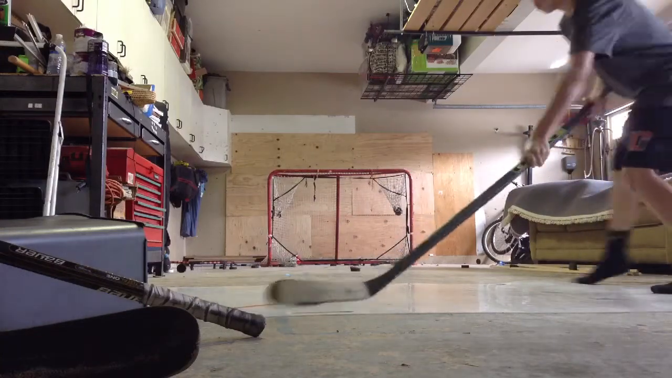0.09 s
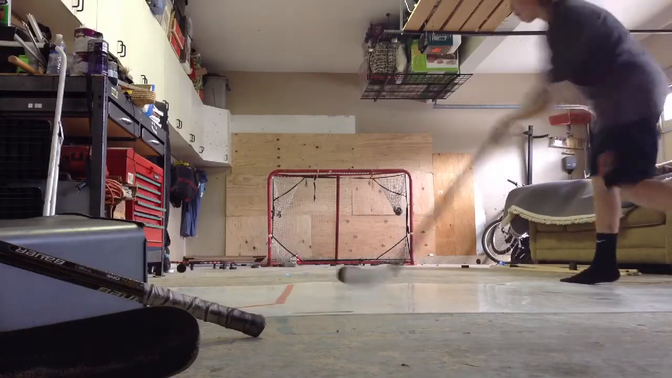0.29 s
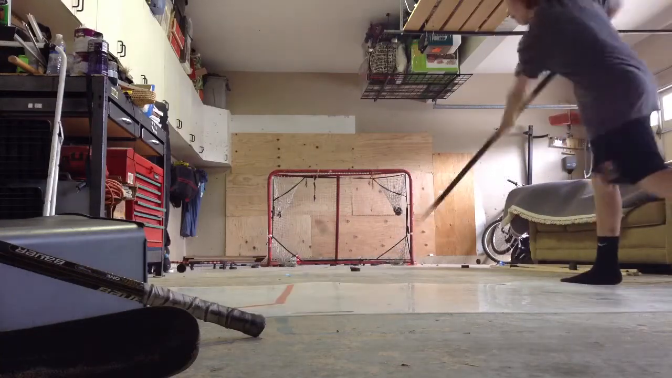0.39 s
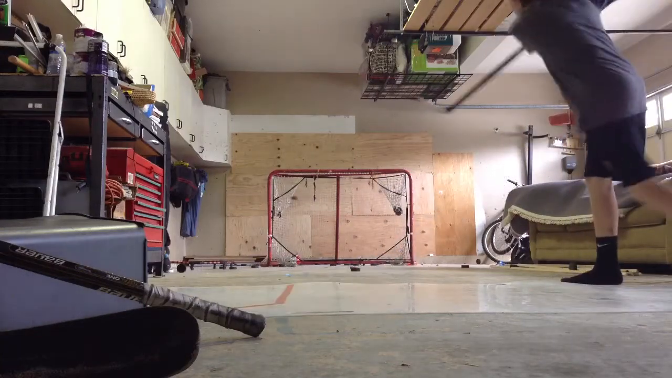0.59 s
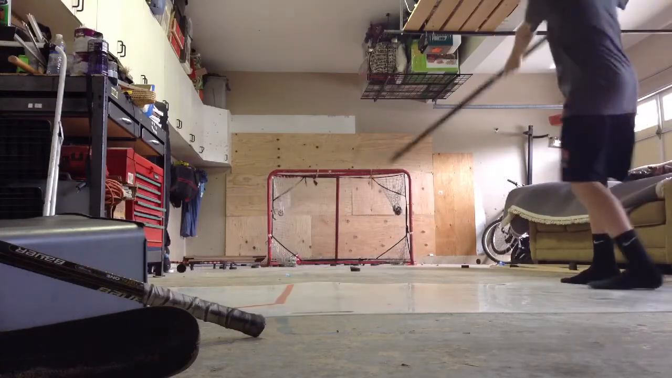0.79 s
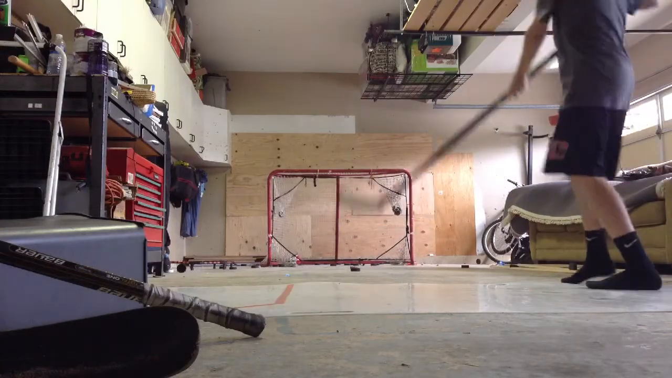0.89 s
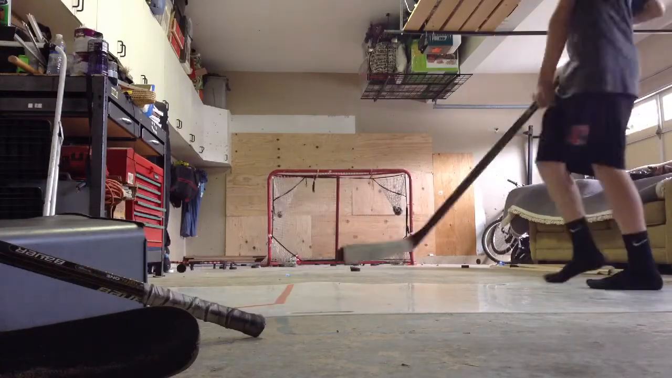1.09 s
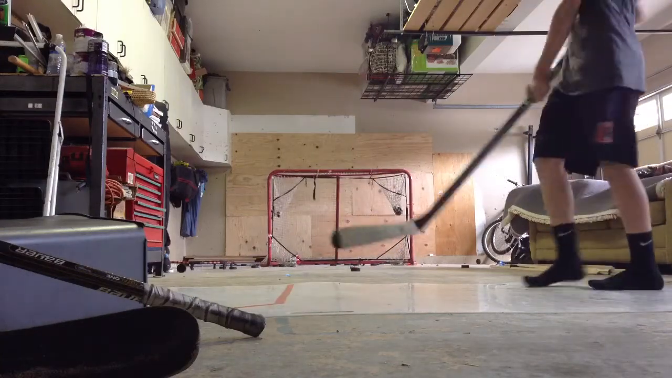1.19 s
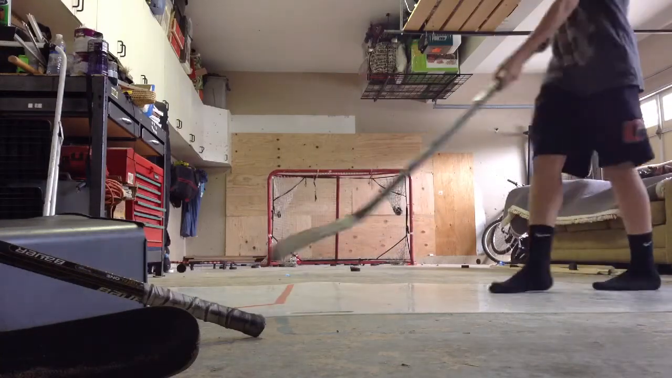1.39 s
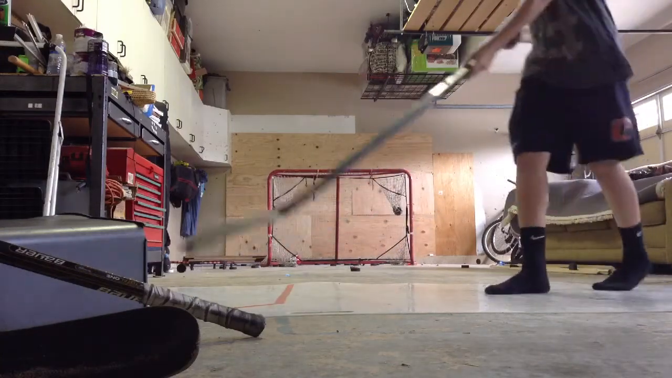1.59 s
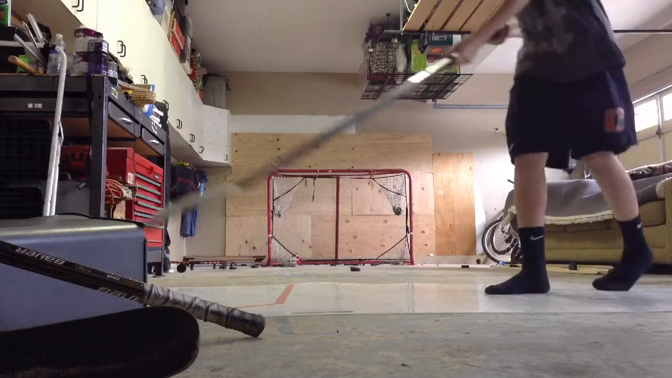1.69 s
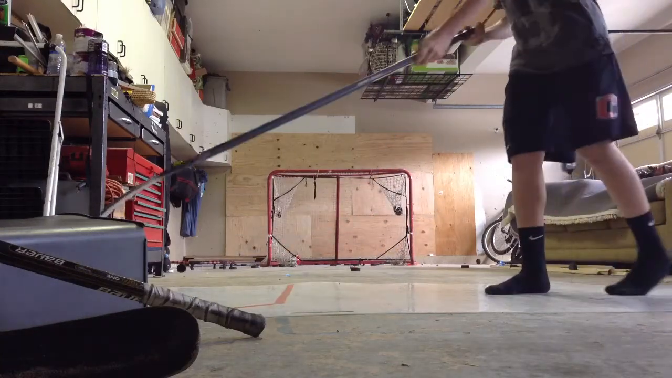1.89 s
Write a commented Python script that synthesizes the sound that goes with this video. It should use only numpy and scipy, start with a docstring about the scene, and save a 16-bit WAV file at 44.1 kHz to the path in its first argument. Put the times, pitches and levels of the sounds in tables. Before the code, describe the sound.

Short gritty drag, then a loud, bright stick clack with a roomy echo; puck knocks follow in clusters with a thin skid and soft sock shuffles, fading to faint hiss in a hard garage.

```python
"""A stick blade drags a puck over a plastic pad and snaps it away: coloured clicks over sliding grit.
The puck thuds into net and boards, bounces and skids on the floor of a bare garage; each blow is heard
direct, in near echoes and through the room's decaying tail. Sharp ticks and thin squeaks of plastic
stand out. Socks shuffle near the microphone as soft noise, over room hiss and a faint mains hum."""
import sys
import numpy as np
from scipy import signal
from scipy.fft import rfft, irfft
from scipy.io import wavfile

SR = 44100
rng = np.random.default_rng(int(sys.argv[2]) if len(sys.argv) > 2 else 0)


def unload_wav(signal):
    """Save mono or channel-first audio to the path in sys.argv[1] as 16-bit WAV at rate SR, clipped to [-1, 1]."""
    wavfile.write(
        sys.argv[1],
        SR,
        np.round(np.clip(np.atleast_2d(signal).T, -1, 1) * 32767).astype(np.int16),
    )


def gain_from_db(level_db):
    """Convert decibel levels to linear amplitude factors (20 dB per decade)."""
    decades = np.asarray(level_db, float) / 20
    return 10 ** decades


N = 83790

# Blows of the stick blade on puck and pad, levels by path to the microphone:
# start_s, direct_db, early_echo_db, room_db, tilt_db_per_octave, knock_hz
STICK_BLOWS = [(.104, -43, -35.5, -44, -9.5, 330), (.196, -17.5, -21, -21, -11.5, 500),
               (.206, -12.5, -16.5, -23, -2.5, 724), (.219, -32, -21, -20, -4, 500),
               (.245, -5, -0.5, 1.5, 0, 636), (.263, -13, -3, 7.5, 5, 2260), (.282, -9, 1, 5, -0.5, 910),
               (.33, -26, -7, 1.5, 4.5, 3630)]
# Blows of the puck on net, boards and floor, same columns:
# start_s, direct_db, early_echo_db, room_db, tilt_db_per_octave, knock_hz
PUCK_BLOWS = [(.688, -24, -15, -12, -4.5, 330), (.705, -14, -13.5, -10, -3, 730),
              (.722, -41, -10, -13, 0, 1000), (.745, -39, -12, -12, 0.5, 910),
              (.795, -18, -20, -24, -3, 330), (.885, -20, -8.5, -9.5, -3, 450),
              (.895, -12, -12, -16, 2.5, 5400), (.908, -42, -3.5, -8.5, 0.5, 2300),
              (.965, -15, -16, -21, -0.5, 540), (1.139, -23, -2, -2, -0.5, 1060),
              (1.150, -5, 0.5, -3.5, 1, 5400), (1.200, -12, -10.5, -11, -0.5, 960),
              (1.643, -61, -40, -40.5, -5.5, 383), (1.69, -50, -46, -47.5, -3.5, 350),
              (1.73, -51.5, -48, -46.5, -3, 340)]
# Broad, quickly damped colour of the blade: pitch_hz, relative_level_db
BLADE_COLOUR = [(59, -81), (100, -40), (343, -9.5), (513, -13), (608, 2), (780, 3), (991, -5.5), (1230, 6),
                (1450, -9.5), (1620, -7.5), (2300, -9.5), (4000, -17.5), (7940, -26), (15500, -40.5)]
# Broad, quickly damped colour of net, boards and floor: pitch_hz, relative_level_db
BOARD_COLOUR = [(59, -80), (100, -36.5), (295, -7.5), (600, -5.5), (1030, -4.5), (1200, -7.5), (2080, -9),
                (2750, -12.5), (3470, -14.5), (4670, -19), (9000, -25.5), (15500, -37)]
# Longer-ringing modes of the blade: pitch_hz, width_hz, rise_above_colour_db
BLADE_RINGS = [(436, 13, 4.5), (762, 30, 3), (840, 18, 4.5), (999, 9.5, 6.5), (1477, 40, 9.5),
               (1835, 30, 4.5), (2314, 46, 6), (3280, 60, 4)]
# Longer-ringing modes of net, boards and floor: pitch_hz, width_hz, rise_above_colour_db
BOARD_RINGS = [(330, 21, 1.7), (425, 12, 1.6), (640, 53, 3.6), (960, 20, 3), (1050, 23, 4.6),
               (1510, 46, 4.4), (2130, 68, 3.4), (5400, 220, 2.4)]
# Decay of the bare garage: pitch_hz, time_to_fall_60_db_s
GARAGE_DECAY = [(120, 1), (250, 0.42), (530, .65), (1400, 0.63), (3700, 0.79), (7000, 0.77), (11000, 0.42),
                (15000, 0.19)]
# Blade and puck dragged over the pad: time_s, level_db
DRAG_LEVEL = [(0, -39), (.08, -34), (.118, -29.5), (.17, -31), (.21, -32.5), (.24, -27)]
# Colour of the drag: pitch_hz, relative_level_db
DRAG_SPECTRUM = [(150, -53), (280, -9), (600, -13.5), (900, -7.5), (1400, -5), (2250, 0.5), (3000, -3.5),
                 (5000, -4), (9500, -5), (11000, 0), (15500, 0.5)]
# Puck skidding on: time_s, level_db
SKID_LEVEL = [(.9, -32.5), (1.0, -54), (1.12, -51.5), (1.2, -37.5), (1.32, -49), (1.43, -51.5),
              (1.52, -63.5)]
# Colour of the skid: pitch_hz, relative_level_db
SKID_SPECTRUM = [(600, -51), (2000, -23), (6000, 1), (11000, 2), (15500, -1)]
# Sharp treble ticks: start_s, peak_level_db
TICK_TIMES = [(0.119, -15), (.2452, -5), (.2628, -3.5), (.2745, -11), (.535, -30), (1.136, -38)]
# Colour of the ticks: pitch_hz, relative_level_db
TICK_SPECTRUM = [(500, -44.5), (2500, -4), (6000, 12), (11000, -2.5), (15500, -9)]
# Thin squeaks of rubbing plastic: start_s, length_s, pitch_hz, resonator_pole_width_hz, level_db
SQUEAK_TIMES = [(.195, .024, 4500, 150, -41), (.217, .009, 5350, 300, -39), (.74, .14, 5450, 180, -54),
                (.755, .105, 10150, 250, -47)]
# Socks on the floor, one list for each shuffle: time_s, level_db
SHUFFLE_LEVELS = [
    [(.5, -60), (.6, -50), (.63, -47.5), (.66, -38), (.72, -37), (.8, -43.5), (.85, -52), (.89, -42)],
    [(1.62, -78), (1.664, -57.5), (1.732, -53.5), (1.8, -51), (1.9, -52.5)],
]
# Colour of the socks: pitch_hz, relative_level_db
SHUFFLE_SPECTRUM = [(350, -40), (700, -28.5), (1500, -13), (4700, -10), (8000, -9.5), (11200, -9),
                    (15500, -11.5)]
# Low shudder after the shot, one row: time_to_fall_20_db_s, pitch_hz, starting_level_db
SHUDDER = (.1, 38, -60)
# Mains hum: pitch_hz, level_db
MAINS_HUM = [(120, -79), (240, -72)]
# Colour of the room hiss: pitch_hz, relative_level_db
HISS_SPECTRUM = [(18, -51.5), (40, -45), (109, -18.5), (250, -2), (426, -4), (684, -7.5), (1040, -19),
                 (1540, -20.5), (6000, -22), (12000, -18), (15500, -15.5)]


def evened(x):
    """Scales x to rms 1."""
    return x / np.sqrt(np.mean(x ** 2) + 1e-20)


def read(points, hz):
    """Reads a table of pitches and values at hz, along a log pitch scale."""
    pitch, value = np.transpose(points)
    return np.interp(np.log(hz + 1), np.log(pitch + 1), value)


def add(mix, start_s, sound):
    """Lays a sound into the mix, cut off where the mix ends."""
    part = mix[round(start_s * SR):][:len(sound)]
    part += sound[:len(part)]


def colour(x, points):
    """Shapes x by a spectrum; rms 1."""
    gain = gain_from_db(read(points, np.fft.rfftfreq(len(x), 1 / SR)))
    return evened(irfft(rfft(x) * gain, len(x)))


def narrow(count, hz, pole_width_hz):
    """Noise in a narrow resonance of two equal poles, so it wavers around one pitch; rms 1."""
    settle = SR // 5
    r = np.exp(-np.pi * pole_width_hz / SR)
    noise = rng.standard_normal(count + settle) + 1j * rng.standard_normal(count + settle)
    slow = signal.lfilter([1], [1, -2 * r, r * r], noise)[-count:]
    carrier = np.exp(2j * np.pi * hz * np.arange(count) / SR)
    return evened((slow * carrier).real)


def causal(db):
    """The minimum-phase click: its spectrum is db and it starts at once."""
    log = np.log(gain_from_db(np.maximum(db, -100)))
    full = np.concatenate([log, log[-2:0:-1]])
    phase = -signal.hilbert(full).imag[:len(log)]
    return irfft(np.exp(log + 1j * phase))[:len(log)]


def hits(blows, body, modes, early_s, rise_s):
    """Each blow is a coloured click, heard direct, in a cluster of near echoes and through the room."""
    knock_db, knock_octaves = 4, 0.22
    tilt_hz, tilt_low_hz = 800, 310  # the tilt pivots on the first and levels off below the second
    out, hz, t = np.zeros(N), np.fft.rfftfreq(4096, 1 / SR), np.arange(SR // 8) / SR
    shape = read(body, hz)
    shape = shape + sum(db / (1 + (2 * (hz - f) / width) ** 2) for f, width, db in modes)
    octaves = np.log2(np.maximum(hz, tilt_low_hz) / tilt_hz)
    for start_s, direct_db, early_db, room_db, tilt, knock_hz in blows:
        knock = knock_db * np.exp(-(np.log2((hz + 1) / knock_hz) / knock_octaves) ** 2)
        blow = causal(shape + knock + tilt * octaves)
        blow /= abs(blow).max()
        echoes = rng.choice([-1., 1.], len(t)) * (rng.random(len(t)) < 0.06)  # sparse, random sign
        echoes = echoes * np.exp(-t / early_s) * (1 - np.exp(-t / rise_s))
        path = gain_from_db(room_db) * garage()
        path[:len(t)] += gain_from_db(early_db) * echoes / np.linalg.norm(echoes)
        path[0] += gain_from_db(direct_db)
        add(out, start_s, signal.fftconvolve(blow, path))
    return out


def stick_blows():
    """The blade strikes puck and pad; its modes ring and the near echoes die quickly."""
    return hits(STICK_BLOWS, BLADE_COLOUR, BLADE_RINGS, early_s=0.0062, rise_s=0.00066)


def puck_blows():
    """The puck strikes net, boards and floor; the near echoes rise and die more slowly."""
    return hits(PUCK_BLOWS, BOARD_COLOUR, BOARD_RINGS, early_s=0.028, rise_s=0.0014)


def garage():
    """Sparse taps of random sign that build up, each band dying at its own speed; energy 1."""
    build_s, first_echo_s = 0.01, 0.0013
    slots = np.arange(0, SR - 12, 12)
    at = slots + rng.integers(0, 12, len(slots))  # one tap in every 12 samples
    taps = np.zeros(SR)
    taps[at] = rng.choice([-1., 1.], len(at))
    hz, t, bands = signal.stft(taps, SR, nperseg=256)
    decay = gain_from_db(-60 * t / read(GARAGE_DECAY, hz)[:, None])
    tail = signal.istft(bands * decay, SR, nperseg=256)[1][:SR]
    since_first = np.maximum(np.arange(SR) / SR - first_echo_s, 0)
    tail = tail * (1 - np.exp(-since_first / build_s))
    return tail / np.linalg.norm(tail)


def stroke(curve, points):
    """Dense grit of uneven size, coloured, under the level of the stroke."""
    grit_db, grit_per_s, end_s = 1.2, 16000, 0.011  # mean size spread, density, fade at either end
    size = gain_from_db(grit_db * rng.exponential(1, N))
    grit = size * rng.standard_normal(N) * (rng.random(N) < grit_per_s / SR)
    s, db = np.transpose(curve)
    t = np.arange(N) / SR
    ends = np.clip(np.minimum(t - s[0], s[-1] - t) / end_s + 1, 0, 1)
    return colour(grit, points) * gain_from_db(np.interp(t, s, db)) * ends


def drag():
    """Blade and puck rub over the grain of the pad."""
    return stroke(DRAG_LEVEL, DRAG_SPECTRUM)


def skid():
    """The puck skids on with a thin, treble-heavy scrape."""
    return stroke(SKID_LEVEL, SKID_SPECTRUM)


def ticks():
    """Hard edges meet for an instant, close to the microphone."""
    out = np.zeros(N)
    tick = causal(read(TICK_SPECTRUM, np.fft.rfftfreq(1024, 1 / SR)))
    for start_s, db in TICK_TIMES:
        add(out, start_s, gain_from_db(db) * tick / abs(tick).max())
    return out


def squeaks():
    """Short fuzzy whistles of rubbing plastic: narrow noise under a rounded window."""
    out = np.zeros(N)
    for start_s, length_s, hz, width, db in SQUEAK_TIMES:
        count = round(length_s * SR)
        whistle = narrow(SR // 4, hz, width)[:count]
        add(out, start_s, gain_from_db(db) * whistle * signal.windows.tukey(count, 0.4))
    return out


def shuffle():
    """Socks rub over the floor near the microphone."""
    return sum(stroke(curve, SHUFFLE_SPECTRUM) for curve in SHUFFLE_LEVELS)


def shudder():
    """Low noise in a broad resonance that dies away after the shot."""
    out = np.zeros(N)
    fall_s, hz, db = SHUDDER
    t = np.arange(SR // 2) / SR
    rise = np.minimum(t * 100, 1)  # 10 ms
    add(out, 0.24, gain_from_db(db - 20 * t / fall_s) * narrow(len(t), hz, 2 * hz) * rise)
    return out


def hum():
    """Mains harmonics as very narrow noise, so each wavers slowly."""
    return sum(gain_from_db(db) * narrow(N, hz, 3.7) for hz, db in MAINS_HUM)


def hiss():
    """Steady room hiss: coloured noise at -60.5 dB rms."""
    return gain_from_db(-60.5) * colour(rng.standard_normal(N), HISS_SPECTRUM)


def scene():
    """Stick and puck in the garage, socks near the microphone, then the background; one channel."""
    action = stick_blows() + puck_blows()
    action += drag() + skid() + ticks() + squeaks() + shuffle()
    background = shudder() + hum() + hiss()
    return (action + background)[None]


def top_cut(x):
    """Nothing passes above the cut-off."""
    return signal.sosfilt(signal.butter(12, 16590, fs=SR, output="sos"), x)


def record(dry):
    """The band limit of the camera: a steep low-pass at 15330 Hz."""
    low_pass = signal.firwin(401, 15330, window=("kaiser", 8), fs=SR)
    limited = signal.oaconvolve(dry, low_pass[None], "same")
    return top_cut(limited)


dry = scene()
out = record(dry)
unload_wav(out)
```